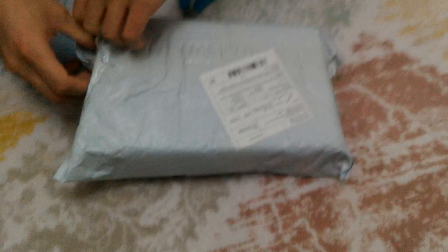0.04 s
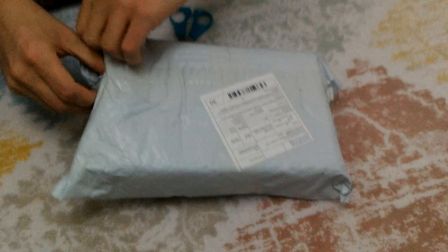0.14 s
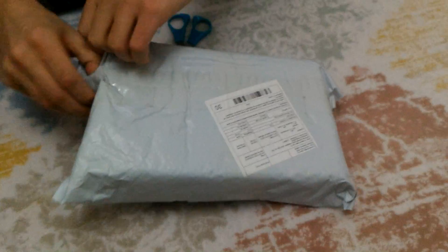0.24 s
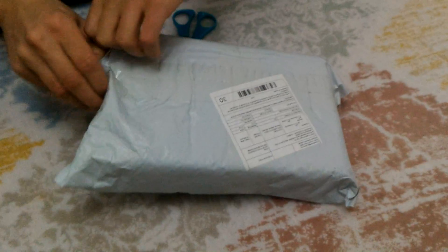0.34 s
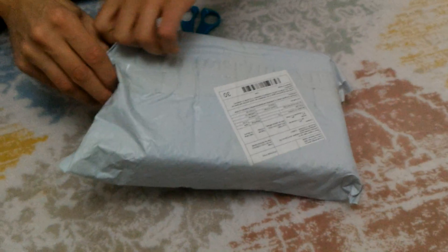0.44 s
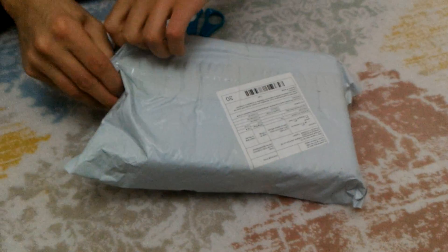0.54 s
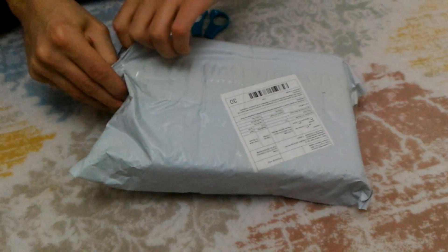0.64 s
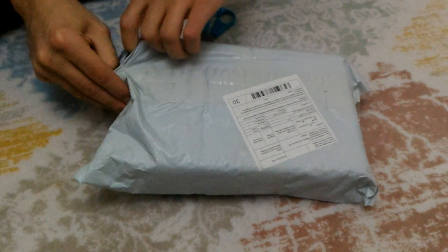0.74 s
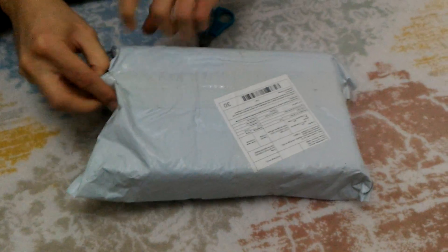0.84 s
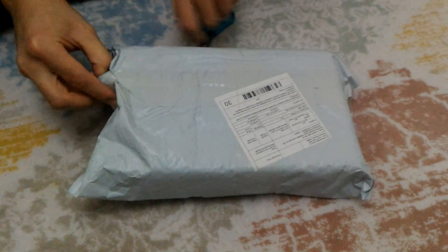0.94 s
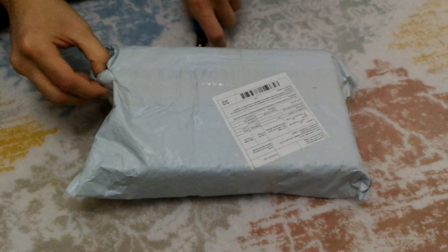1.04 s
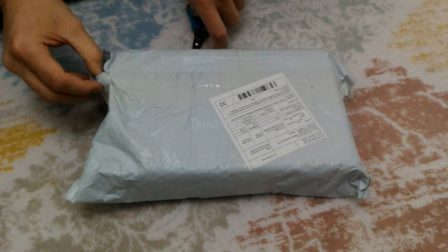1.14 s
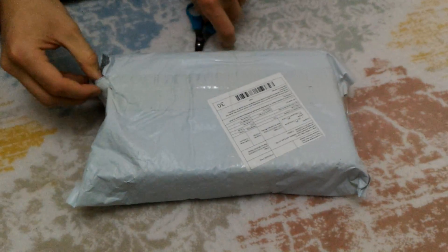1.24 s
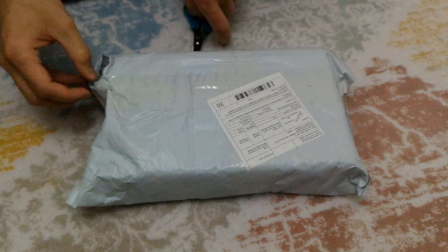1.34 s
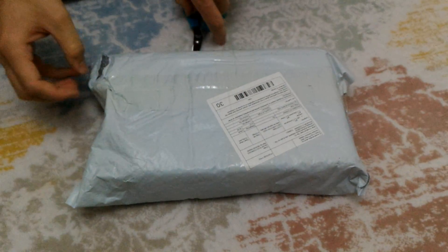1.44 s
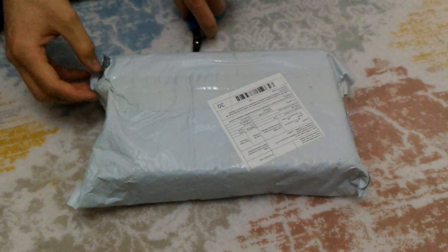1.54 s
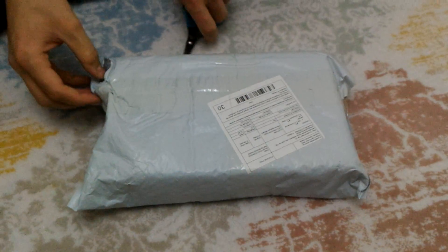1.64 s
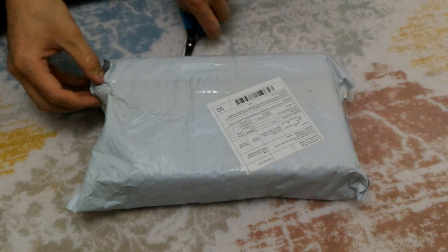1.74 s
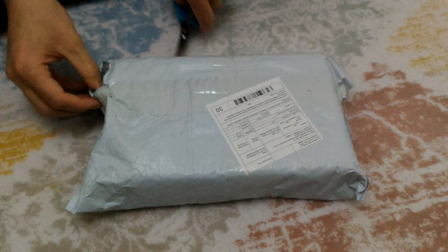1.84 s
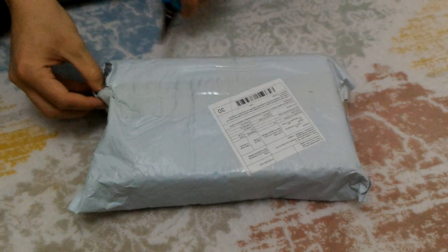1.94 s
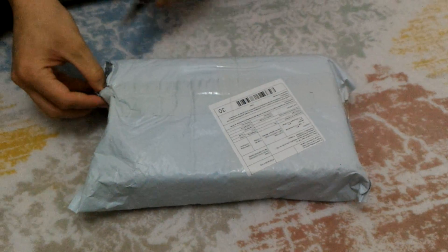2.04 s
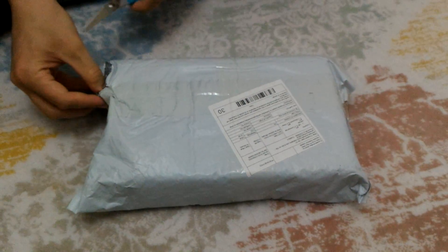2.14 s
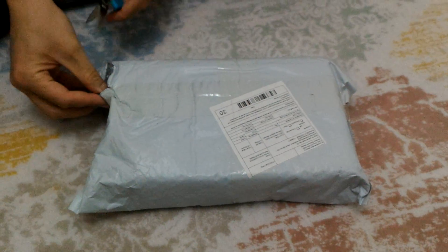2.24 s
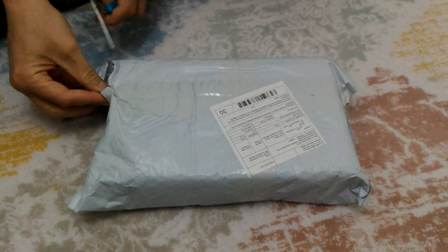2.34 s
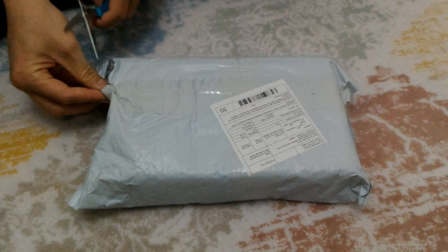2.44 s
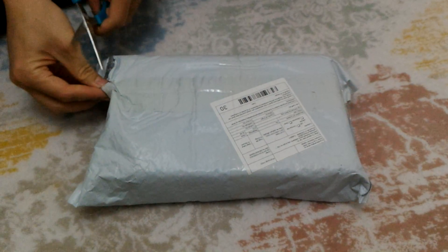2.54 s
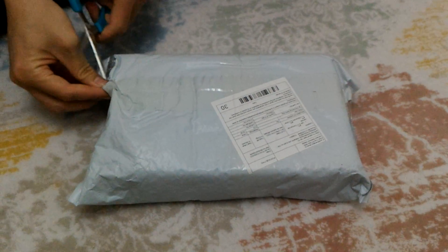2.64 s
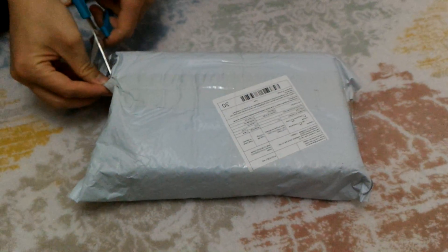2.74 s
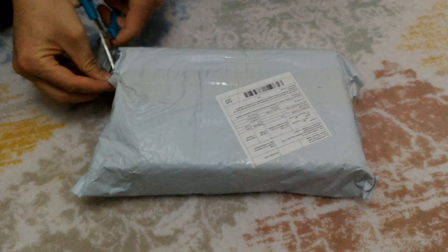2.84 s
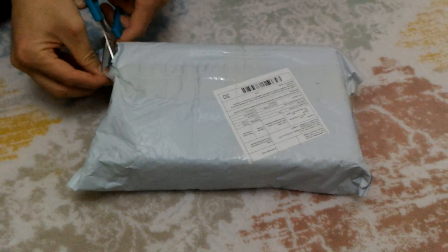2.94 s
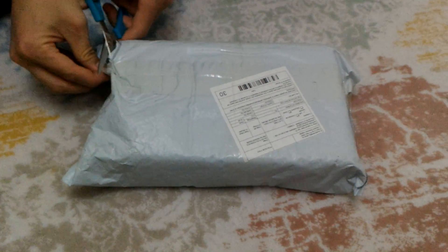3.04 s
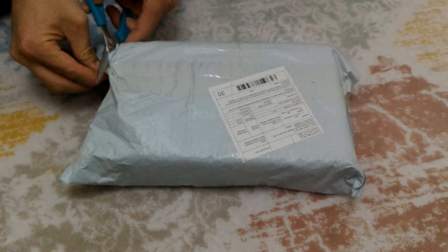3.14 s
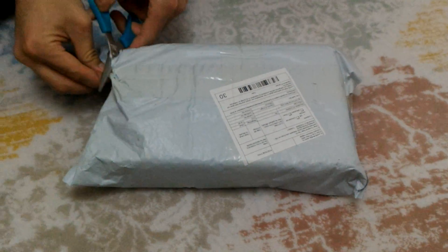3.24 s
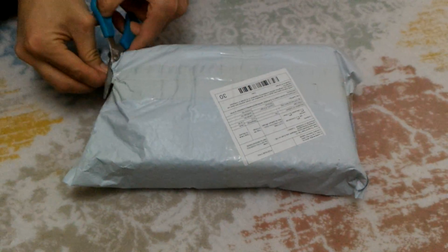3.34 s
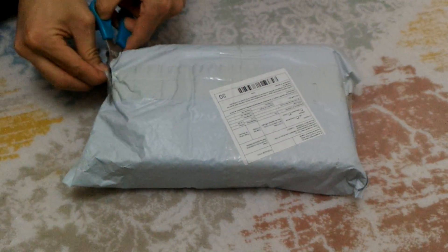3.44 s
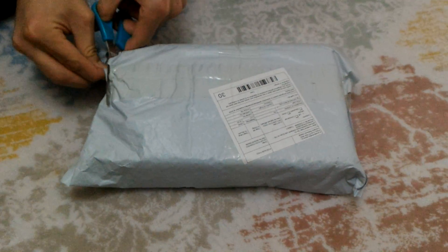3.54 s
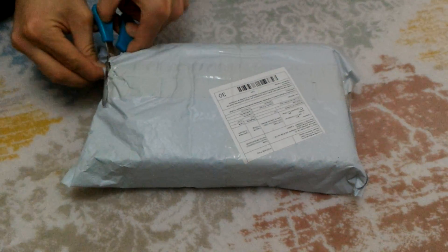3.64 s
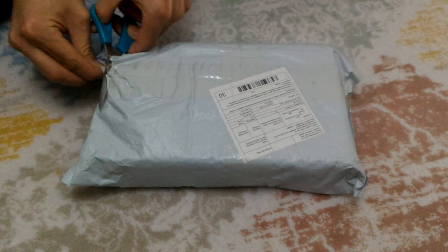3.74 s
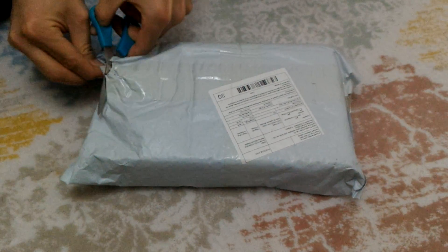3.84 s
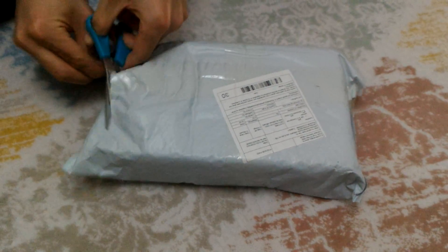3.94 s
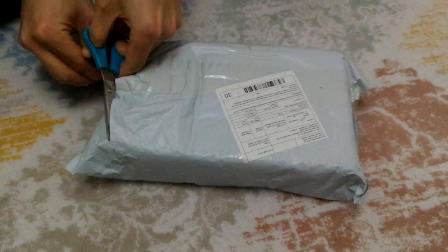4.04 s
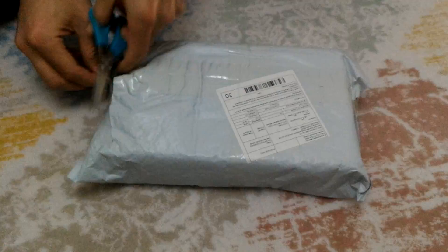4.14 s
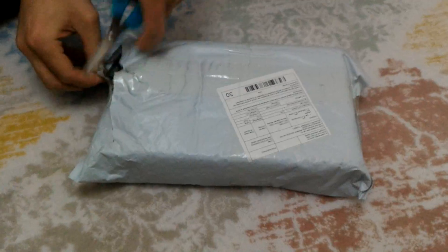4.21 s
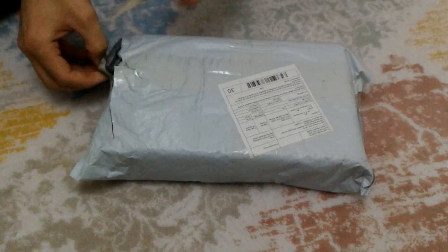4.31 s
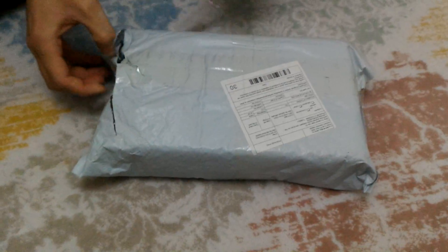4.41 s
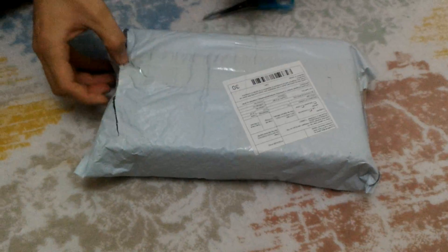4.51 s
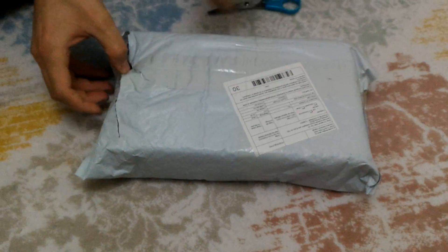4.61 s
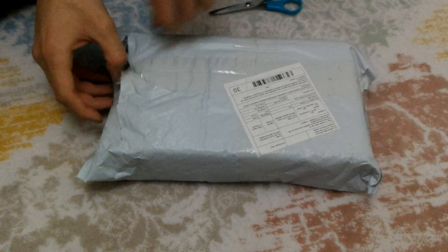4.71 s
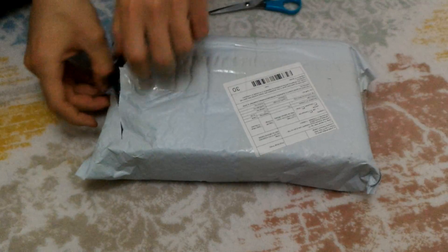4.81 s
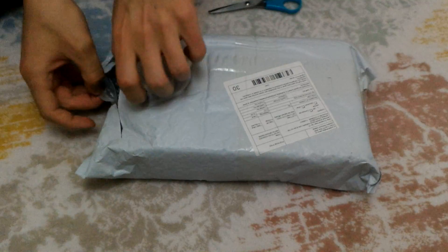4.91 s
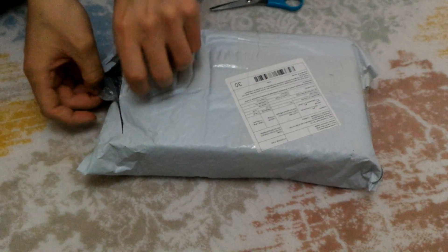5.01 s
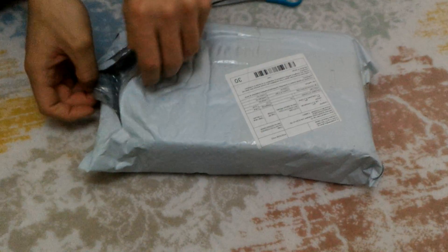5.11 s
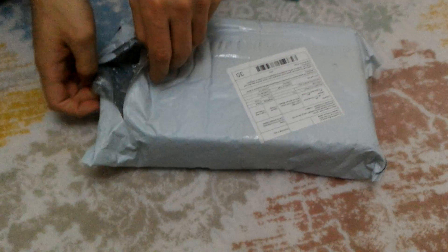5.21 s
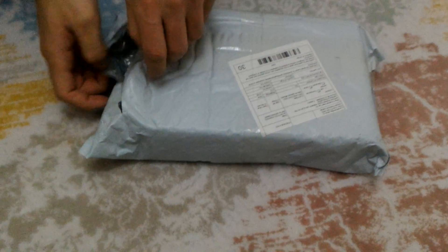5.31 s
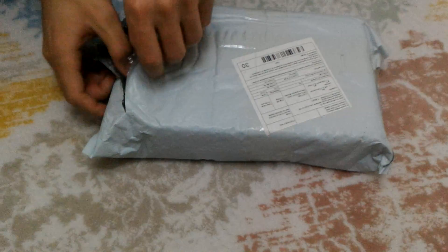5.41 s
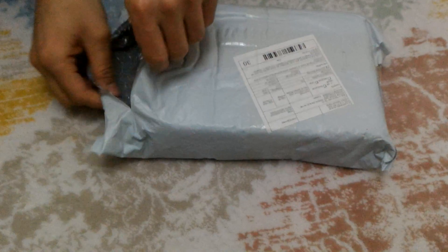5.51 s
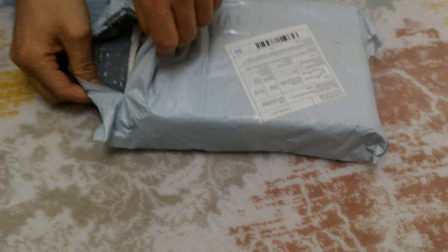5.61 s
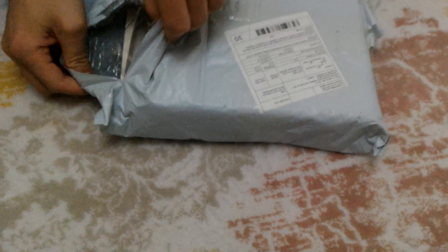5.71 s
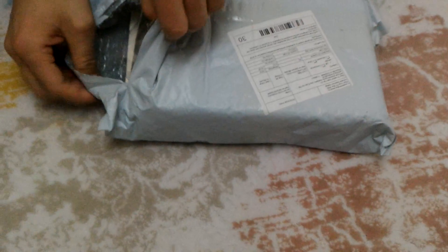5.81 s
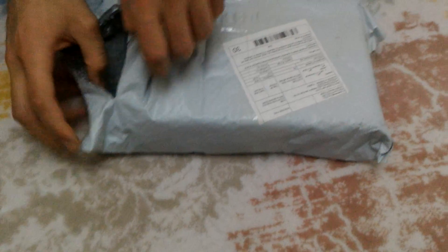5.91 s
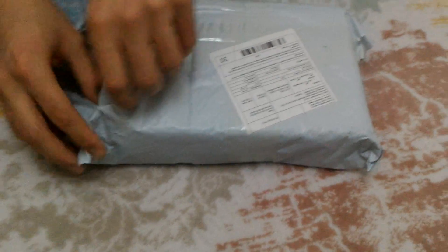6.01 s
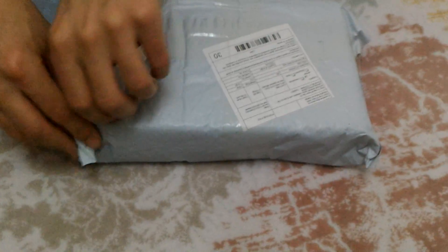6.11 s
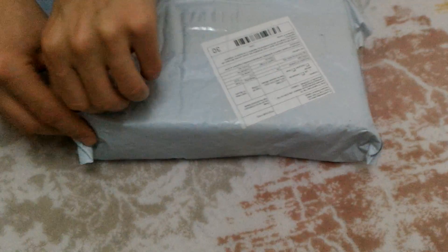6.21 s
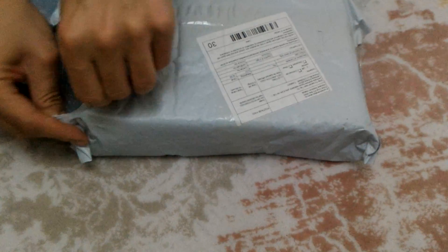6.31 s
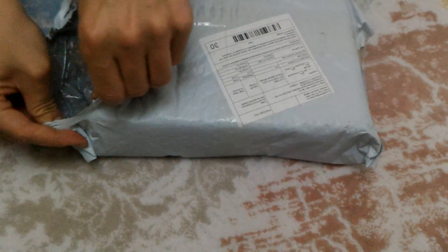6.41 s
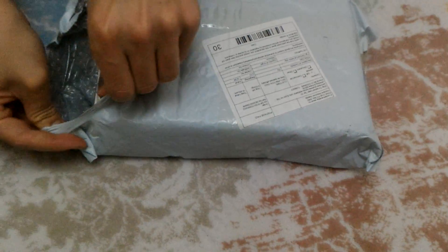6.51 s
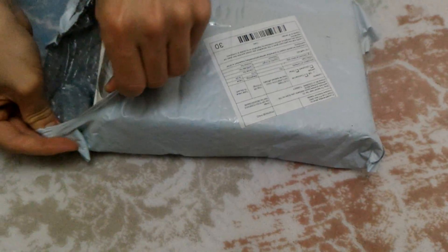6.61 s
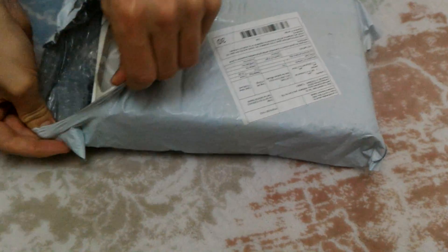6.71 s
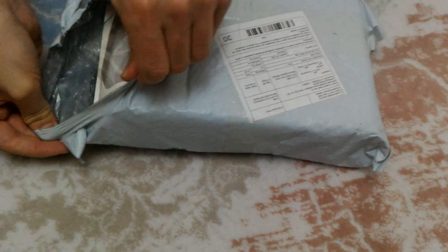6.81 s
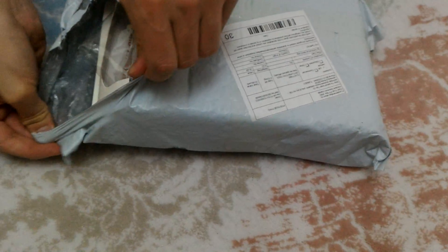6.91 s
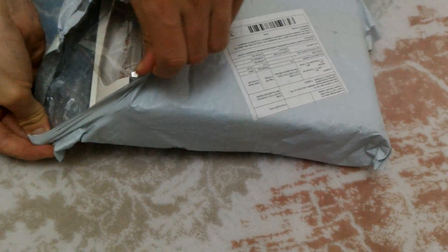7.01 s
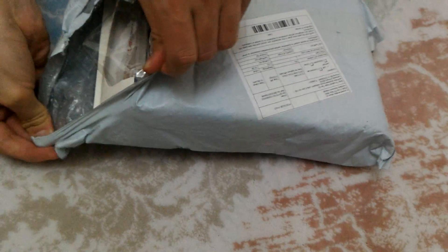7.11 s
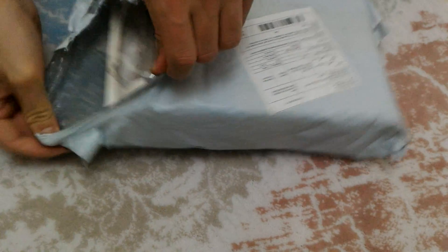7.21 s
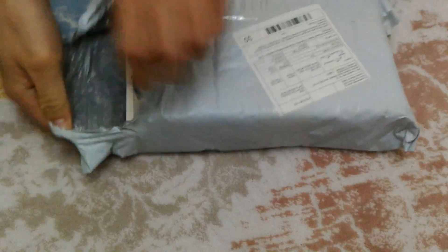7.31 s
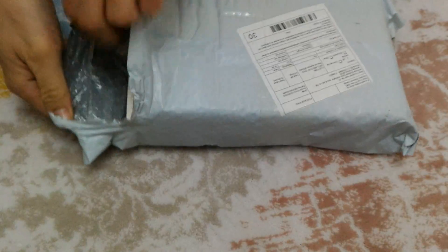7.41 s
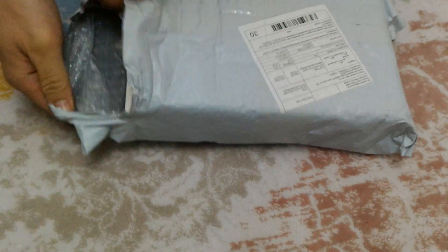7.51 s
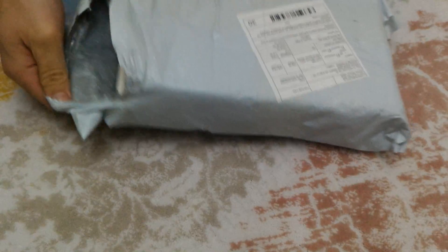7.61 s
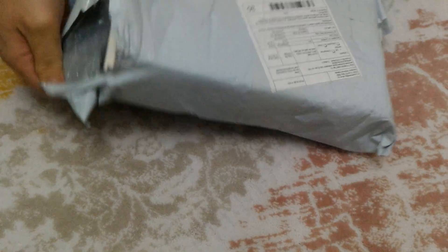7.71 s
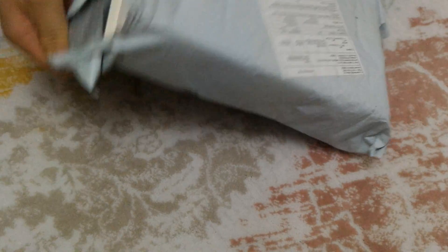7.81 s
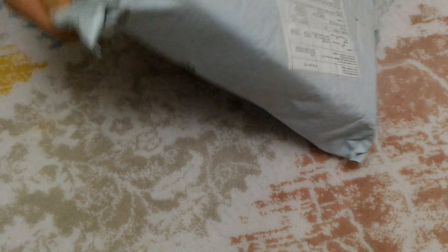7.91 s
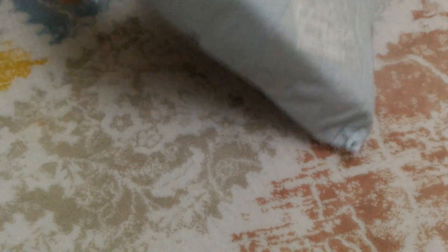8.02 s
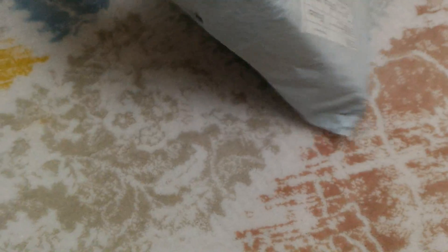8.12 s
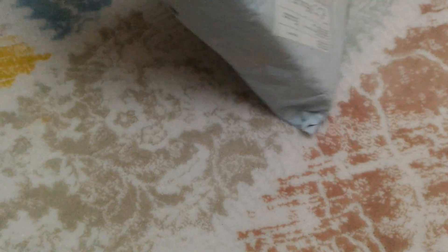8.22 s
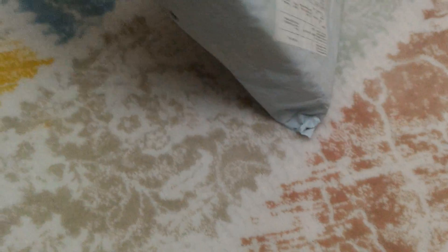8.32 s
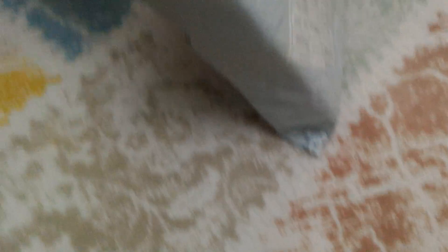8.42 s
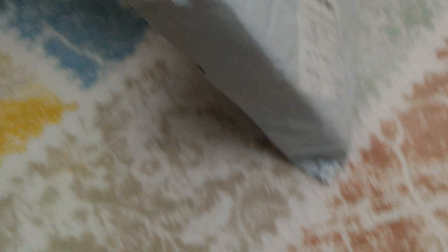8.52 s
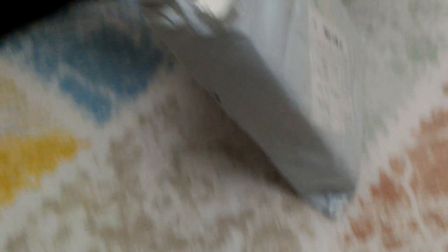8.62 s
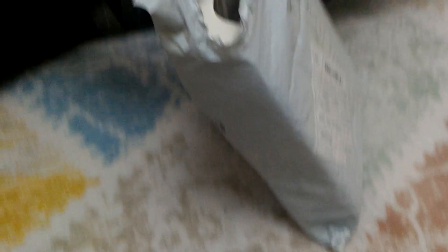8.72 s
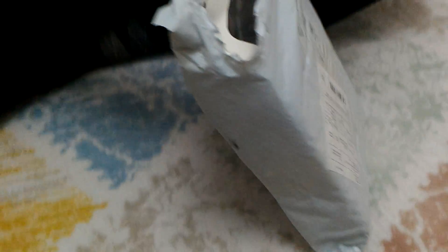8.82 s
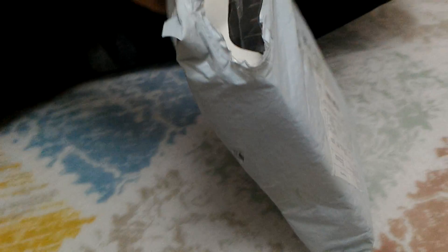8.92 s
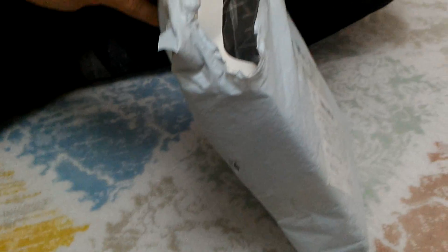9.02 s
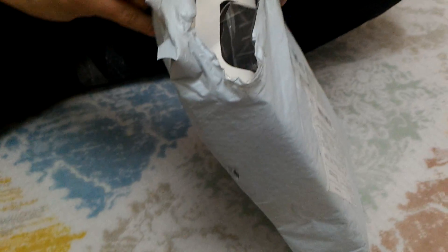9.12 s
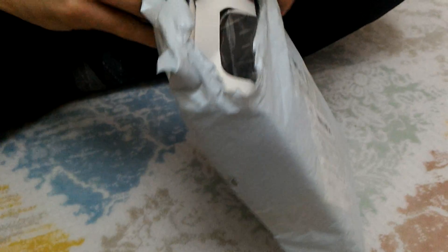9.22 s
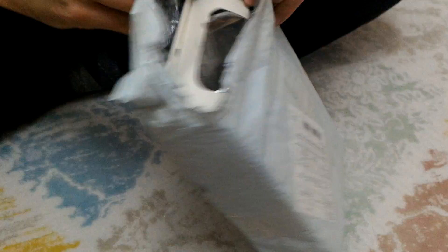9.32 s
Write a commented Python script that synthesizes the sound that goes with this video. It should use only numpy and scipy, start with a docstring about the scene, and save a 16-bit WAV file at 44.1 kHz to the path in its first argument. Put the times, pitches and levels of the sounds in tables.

```python
"""Plastic mailer bag opened on a rug

Hands pull at a plastic mailer bag, snip its end with scissors, tear it open and lift it.
Creases are short noise bursts through the film's colour; crackle is a swarm of tiny buckles,
and sliding fingers are wavering noise. Resonances of the boxed contents give a hollow rustle
and colour the soft bumps; a small room adds a brief noise tail and faint still air."""
import sys
import numpy as np
from scipy import signal
from scipy.fft import rfft, irfft
from scipy.io import wavfile
from scipy.ndimage import uniform_filter1d, minimum_filter1d

SR = 44100
rng = np.random.default_rng(int(sys.argv[2]) if len(sys.argv) > 2 else 0)


def write(x):
    x = np.atleast_2d(x).T
    wavfile.write(sys.argv[1], SR, np.round(np.clip(x, -1, 1) * 32767).astype(np.int16))


N = 412335  # samples

# creases and cuts that stand out of the rustle: start_s, level_db (crack alone, rms over 5 ms),
# treble_db (gain above 5 kHz), length_ms (nominal)
CREASE_SNAPS = [(0.023, -30.5, 3, 0.15), (0.0595, -23, 3, 0.17), (0.178, -33, -36, 3),
                (0.205, -22, 15, 0.46), (0.22, -24, -6, .7), (0.287, -19, -14, 1.9),
                (0.3417, -23.5, -10, 1.7), (0.5818, -33.5, -28, 2), (0.7257, -36, -12, 2),
                (0.7526, -24, 6, 3.4), (1.0574, -31, -14, 1.6), (1.1779, -35.5, -14, 1.4),
                (1.4043, -44, -24, .8), (1.83, -46, 1, 1.1), (1.9138, -41, -4, 1.5),
                (2.1994, -45, -22, 0.74), (2.246, -50.5, 19, 1.4), (2.304, -48, -18, 0.63),
                (3.0084, -33.5, -7, 0.53), (3.047, -32.5, 6, 2.5), (3.163, -27.5, -26, 3.4),
                (3.214, -36, 26, 0.76), (3.2858, -27, -45, 3.8), (3.3483, -25, 4.5, 2.9),
                (3.4095, -24.5, 5.5, 6.8), (3.7256, -34, 3, 0.22), (4.0705, -27.5, -10, 3.3),
                (4.2776, -34, 18, 3.7), (4.495, -38, -1, 1.6), (4.6597, -30, 7, 0.9),
                (4.9102, -29, -17, 2.6), (4.9382, -30.5, -9, 1.3), (5.043, -26.5, 8, 1.1),
                (5.0643, -17.5, 0, 4.2), (5.0916, -24, -22, 5.8), (5.14, -31.5, -33, 2.2),
                (5.2389, -16.5, -6, 2.2), (5.392, -24.5, 6, 1.1), (5.4478, -10.5, -0.5, 1.6),
                (5.4506, -13, -10, 1.7), (5.5162, -12, -4, 0.65), (5.594, -20, -14, 4),
                (5.617, -21.5, 8, 1), (5.6537, -23.5, -5, 0.67), (5.752, -32.5, -31, 4.4),
                (5.7851, -20, -15, 2.1), (5.798, -22.5, -29, 1.7), (6.1284, -22.5, 10, 1.7),
                (6.2488, -27.5, 15, 1.5), (6.2982, -25, 12.5, 1), (6.3923, -27, 11.5, 1.5),
                (6.4343, -27, -35, 3.7), (6.5417, -22, 6, 1.03), (6.6319, -18.5, 9.5, 1.7),
                (6.6796, -16, 0, 0.41), (6.755, -17, -1, 2.3), (6.883, -27, 2, 0.79),
                (7.0008, -35, 17, 1.5), (7.2626, -27.5, -29, .4), (7.4412, -17, -8, 2.4),
                (7.5593, -28, -6, 0.36), (7.6344, -22.5, -4, 1), (7.6606, -21.5, -4, 0.78),
                (7.8896, -27, -18, 3), (8.084, -22.5, 8.5, 3.1), (8.1593, -21.5, -3, 1.1),
                (8.274, -34.5, -31, 5.7), (8.8537, -25.5, 1, 1.7), (8.969, -22.5, -12, 1.2),
                (9.2805, -18.5, -26, 1)]


def undb(db):
    """Decibels to gain."""
    return 10 ** (np.asarray(db) / 20)


def unit(x):
    """Scale to rms 1."""
    return x / np.sqrt(np.mean(x ** 2))


def add(track, start_s, sound):
    """Mix a sound in at start_s."""
    start = max(int(start_s * SR), 0)
    track[start:start + len(sound)] += sound[:N - start]


def ring(points, size=2048):
    """Minimum-phase impulse response of unit energy with the given (Hz, dB) colour."""
    hz, db = np.transpose(points)
    bins_hz = np.maximum(np.fft.rfftfreq(size, 1 / SR), 1)
    colour_db = np.interp(np.log(bins_hz), np.log(hz), db)
    # fold the cepstrum onto positive time to make the response causal
    cepstrum = irfft(np.log(undb(colour_db)))
    cepstrum[1:size // 2] *= 2
    cepstrum[size // 2 + 1:] = 0
    response = irfft(np.exp(rfft(cepstrum)))
    return response / np.linalg.norm(response)


def through(x, response):
    """Let x excite a response."""
    return signal.oaconvolve(x, response)[:len(x)]


def treble(x, hz):
    """The part of x above hz, without delay."""
    return signal.sosfiltfilt(signal.butter(2, hz, "high", fs=SR, output="sos"), x)


def band(x, hz, octaves):
    """A resonance of the given width, gain 1 at its centre."""
    edges_hz = hz * 2 ** (np.array([-.5, .5]) * octaves)
    edges_hz = np.clip(edges_hz, 10, .49 * SR)
    return signal.sosfilt(signal.butter(1, edges_hz, "band", fs=SR, output="sos"), x)


def walk(rate_hz):
    """Smooth random wander of rms near 1: random steps under a moving average."""
    step = int(SR / rate_hz)
    steps = np.repeat(rng.standard_normal(N // step + 1), step)
    return unit(uniform_filter1d(steps, step)[:N])


def still_air():
    """Faint steady air noise of the room."""
    # colour: pitch_hz, level_db
    air_colour = [(20, -9), (48, 3.5), (80, -11.5), (300, -22), (1000, -37), (3000, -25.5), (8000, -39.5),
                  (15000, -43.5)]
    return undb(-61.5) * through(rng.standard_normal(N), ring(air_colour, size=8192))


def film_sheet():
    """Impulse response of the plastic film, unit energy."""
    # colour: pitch_hz, level_db
    film_colour = [(150, -36.5), (600, -20.5), (1000, -18), (1400, -13), (2000, -8), (2500, -2.5),
                   (2950, 1), (3500, -11), (4400, -21), (6400, -17), (7800, -22.5), (8400, -21.5),
                   (9400, -31.5), (15500, -61)]
    return ring(film_colour)


def parcel():
    """Impulse response of the boxed parcel, unit energy: parallel resonances under a wide band-pass."""
    # resonances: pitch_hz, width_octaves, level_db
    resonances = [(118, 0.37, 0.5), (154.3, 0.25, 0.5), (268, 0.95, 3), (361, 0.13, 3), (420, 0.18, -3.5),
                  (854, 0.73, -3.5), (1080, 1, -13)]
    tap = signal.unit_impulse(4096)
    response = sum(undb(db) * band(tap, hz, octaves) for hz, octaves, db in resonances)
    response = band(response, 330, octaves=11.3)
    return response / np.linalg.norm(response)


def effort():
    """How hard the film is worked, in dB: moves swell, hold and let go; after a snap the film settles."""
    # grabs, slides and pulls: full_s (when fully under way), effort_db,
    # attack_s (time to rise the last 20 dB), hold_s
    moves = [(0.033, -40.5, .1, 0.16), (0.308, -34.5, 0.6, 0.12), (0.768, -38, 0.19, 0.018),
             (0.918, -54, .2, .14), (1.194, -50.5, 0.33, 0.08), (1.515, -60, 0.27, 0.33),
             (2.44, -65, 0.34, .36), (3.089, -39.5, 0.24, 0.15), (3.415, -41, .2, 0.048),
             (3.673, -45.5, 0.14, 0.084), (3.889, -30, 0.092, 0.039), (4.067, -36, 0.041, 0.013),
             (4.505, -51.5, 0.11, 0.099), (4.769, -44, 0.091, 0.052), (5.043, -31.5, 0.13, 0.041),
             (5.385, -34.5, 0.016, 0.23), (5.791, -43, 0.58, 0.13), (6.12, -33, 0.18, 0.085),
             (6.45, -38.5, 0.33, 0.024), (6.623, -37.5, 0.061, 0.16), (6.854, -44, 0.18, 0.16),
             (7.163, -33.5, 0.094, 0.087), (7.427, -39.5, 0.066, 0.5), (8.038, -33, 0.083, 0.17),
             (8.484, -33.5, 0.16, 0.22), (8.832, -46, 0.13, 0.25), (9.255, -30.5, 0.13, 0.15)]
    release_s = 0.14  # time to sink 20 dB once a hand lets go
    # level for a 0 dB snap, dB per dB of snap, time to sink 20 dB
    settle_db, settle_share, settle_s = -25, 0.69, 0.16
    t = np.arange(N) / SR
    work_db = np.full(N, -90.)
    for full_s, db, attack_s, hold_s in moves:
        before = np.maximum(full_s - t, 0) / attack_s
        after = np.maximum(t - full_s - hold_s, 0) / release_s
        work_db = np.maximum(work_db, db - 20 * (before + after))
    for start_s, db, _, _ in CREASE_SNAPS:
        span = slice(int(start_s * SR), int((start_s + .5) * SR))
        settling_db = settle_db + settle_share * db - 20 * (t[span] - start_s) / settle_s
        work_db[span] = np.maximum(work_db[span], settling_db)
    return work_db


def folds(rate_hz, spread_db, shiver_s):
    """Tiny buckles at random moments, many weak and a few strong; each is a brief shiver of noise."""
    draw = rng.random(N) * SR / rate_hz
    happens = draw < 1
    power = np.zeros(N)
    strength_db = spread_db * np.minimum(-np.log(draw[happens]), 2.9)
    power[happens] = undb(strength_db) ** 2
    t = np.arange(512) / SR
    energy = through(power, t * np.exp(-t / shiver_s))
    return unit(np.sqrt(np.abs(energy)) * rng.standard_normal(N))


def rustle(film, body):
    """Worked film crackles, fingers slide over it, and the parcel under it sounds hollow."""
    # hollow body, which thins as the parcel is lifted: time_s, relative_db
    hollow_levels = [(0, 0), (1, 6.5), (3.2, 3), (3.9, 3.5), (5.45, 7), (6.55, 2), (7.5, 3), (9.3, 0.5)]
    # extra body dB per dB that the touch is lighter than a firm grip
    light_touch_slope, firm_grip_db = 0.062, -34
    work_db = effort()
    hollow_db = np.interp(np.arange(N) / SR, *np.transpose(hollow_levels))
    hollow_db = hollow_db + light_touch_slope * (firm_grip_db - work_db)
    # broad folds pop low and slowly, fine wrinkles tick high
    crackle = np.zeros(N)
    for hz in np.geomspace(600, 10500, 7):
        fineness = hz / 3000
        pops = folds(rate_hz=105, spread_db=11.0 * fineness ** 0.064, shiver_s=0.00054 / np.sqrt(fineness))
        crackle += band(band(pops, hz, octaves=0.97), hz, octaves=0.97)
    # some creases give way all along their length and sound at every pitch
    creases = folds(rate_hz=100, spread_db=5.5, shiver_s=0.00054)
    slide = rng.standard_normal(N) * undb(2 * walk(40))
    # a light touch mostly slides; a firm grip buckles the film
    grip = 1 / (1 + undb(-(work_db + 60)))
    buckling = undb(-0.5) * crackle + undb(-5.5) * creases
    drive = grip * buckling + (undb(-6.5) + 0.34 * (1 - grip)) * slide
    # the treble flickers
    bright = drive + undb(4.5 + 3.3 * walk(25)) * treble(drive, 7620)
    sheet = through(bright * undb(work_db - 1.5), film)
    hollow = (drive + undb(-5) * slide) * undb(work_db + hollow_db - 17.5)
    # the parcel drags over the rug with a low rumble
    rumble = band(band(slide, 49, octaves=1.1), 67, octaves=1.4)
    drag = unit(rumble) * undb(work_db - 23.5)
    return sheet + through(hollow, body) + drag


def snaps(film, body):
    """A crease pops through with a click and a short shudder; longer ones shake the parcel more."""
    # a crease's own ring: pitch, its rise with the treble, gain
    fold_hz, fold_octaves_per_db, fold_ring_db = 2820, .012, -8
    out = np.zeros(N)
    t = np.arange(2048) / SR
    level_window = .005 * SR  # samples
    noises = rng.standard_normal((len(CREASE_SNAPS), len(t)))
    for (start_s, db, treble_db, ms), noise in zip(CREASE_SNAPS, noises):
        length_s = max(ms, .1) / 1000
        push = noise * np.sqrt(t) * np.exp(-t / (0.81 * length_s))
        push /= np.linalg.norm(push)
        push[0] += .25  # click
        crack = through(push, film)
        # tight creases are all treble, slack ones pop lower
        high = treble(crack, 5000)
        low = crack - treble(crack, 2620)
        low_db = min(-9 - 0.31 * treble_db, 2.5)
        crack = crack + (undb(treble_db) - 1) * high + (undb(low_db) - 1) * low
        ring_hz = fold_hz * 2 ** (fold_octaves_per_db * treble_db)
        crack = crack + undb(fold_ring_db) * band(crack, ring_hz, octaves=0.39)
        thud = through(push, body)
        thud_gain = undb(-24 + 3.08 * ms)
        sound = crack / np.linalg.norm(crack) + thud_gain * thud / np.linalg.norm(thud)
        add(out, start_s, sound * undb(db) * np.sqrt(level_window))
    return out


def bumps(body, cycles, width_octaves):
    """Padded pushes through the parcel's resonances; the lower the push, the longer it lasts."""
    # soft knocks of hands and scissors on parcel and rug, and a low bump of the handled camera (8.222 s):
    # start_s, relative_db, push_hz (centre)
    knocks = [(0.954, -40.5, 174), (1.552, -42, 264), (2.2, -53, 480), (2.378, -54.5, 85),
              (3.118, -39.5, 288), (3.164, -39.5, 290), (3.232, -41.5, 260), (3.943, -39, 223),
              (4.07, -37, 196), (4.415, -52, 229), (4.469, -44, 186), (4.52, -50, 170), (5.065, -35.5, 253),
              (5.181, -47, 115), (5.239, -41, 286), (5.45, -33.5, 270), (6.149, -34.5, 650),
              (6.169, -38, 1040), (6.391, -39, 790), (7.262, -36.5, 121), (8.222, -39.5, 63.5),
              (8.427, -35, 660), (8.868, -42.5, 87), (9.029, -38.5, 1570)]
    out = np.zeros(N)
    t = np.arange(8192) / SR
    noises = rng.standard_normal((len(knocks), len(t)))
    for (start_s, db, hz), noise in zip(knocks, noises):
        push = noise * np.exp(-t * hz / cycles)
        push[0] += np.linalg.norm(push)
        push = band(band(push, hz, width_octaves), hz, width_octaves)
        add(out, start_s, undb(db - 11.5) * unit(through(push, body)))
    return out


def room(x, t60_s, wet_db, gap_s):
    """Scattered echoes from nearby walls and furniture as decaying noise; the treble lasts slightly longer."""
    t = np.arange(SR // 2) / SR
    noise = rng.standard_normal(len(t))
    high = treble(noise, 3380)
    fade = np.exp(-np.log(1000) * t / t60_s)
    onset = 1 - np.exp(-(t / gap_s) ** 2)
    tail = ((noise - high) * fade + high * fade ** 0.88) * onset
    return x + undb(wet_db) * through(x, tail / np.linalg.norm(tail))


def scene():
    """The bag and bumps in the room, over faint air noise."""
    film, body = film_sheet(), parcel()
    bag = rustle(film, body) + snaps(film, body) + bumps(body, cycles=4.3, width_octaves=1.47)
    return (room(bag, t60_s=0.18, wet_db=-10.5, gap_s=0.0068) + still_air())[None]


def record(dry):
    """A fast limiter holds the sharpest snaps at full scale; a low-pass then cuts the top."""
    top_hz = 15400
    gain = minimum_filter1d(1 / np.maximum(np.abs(dry), 1), size=65)
    limited = dry * uniform_filter1d(gain, size=65)
    return signal.sosfilt(signal.ellip(8, .2, 70, top_hz, fs=SR, output="sos"), limited)


dry = scene()
out = record(dry)
write(out)
```